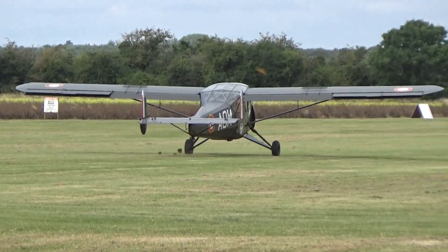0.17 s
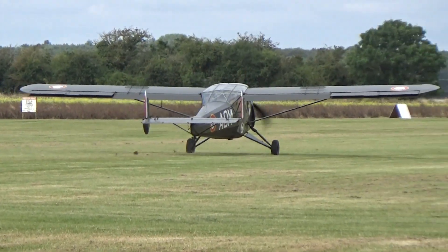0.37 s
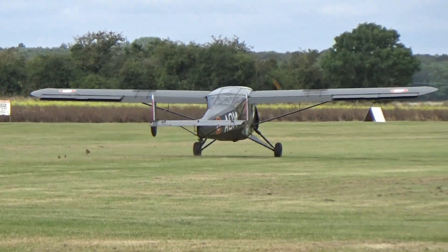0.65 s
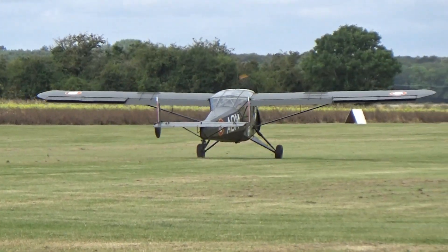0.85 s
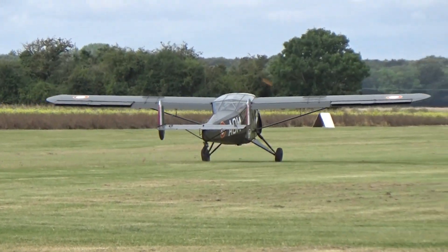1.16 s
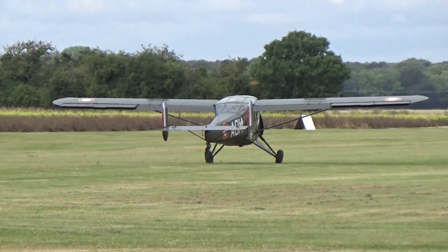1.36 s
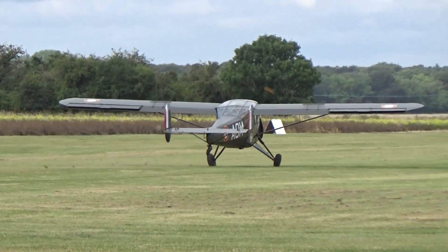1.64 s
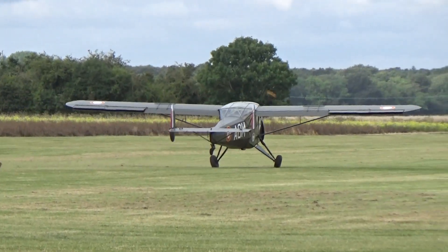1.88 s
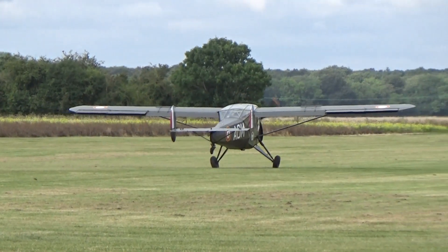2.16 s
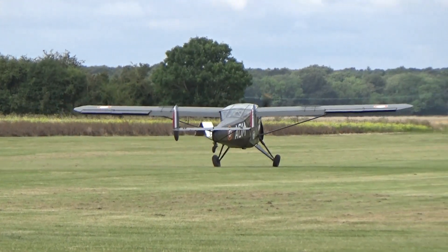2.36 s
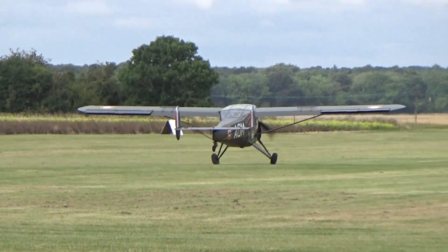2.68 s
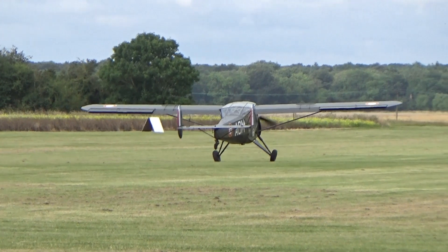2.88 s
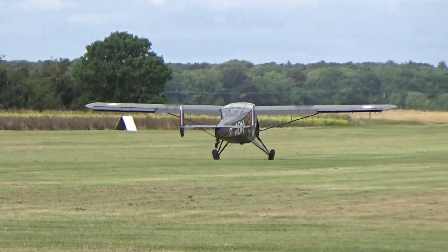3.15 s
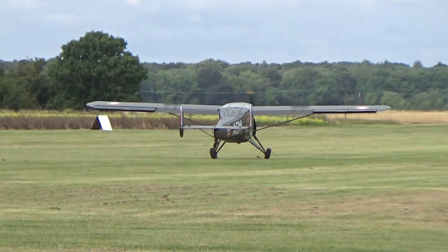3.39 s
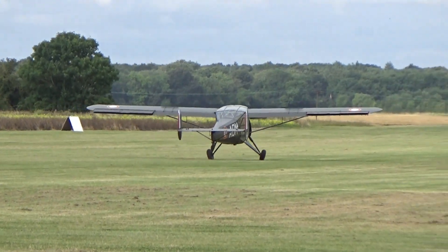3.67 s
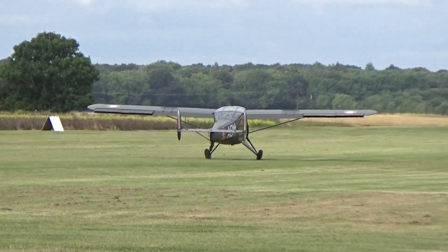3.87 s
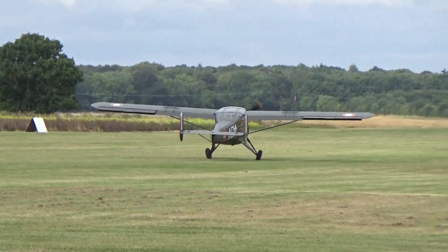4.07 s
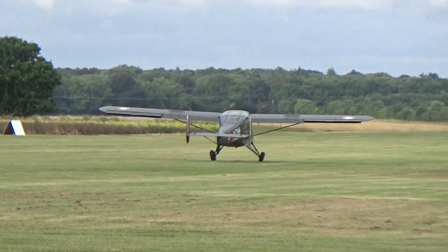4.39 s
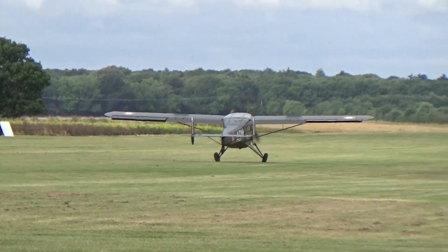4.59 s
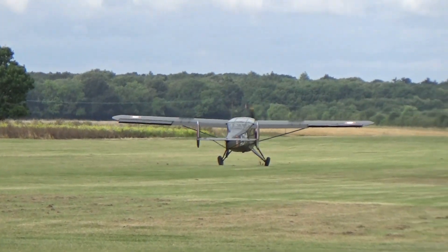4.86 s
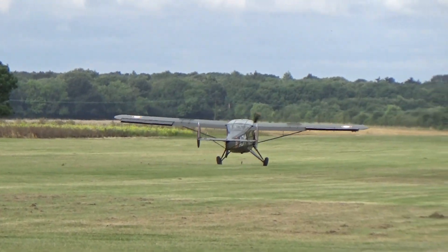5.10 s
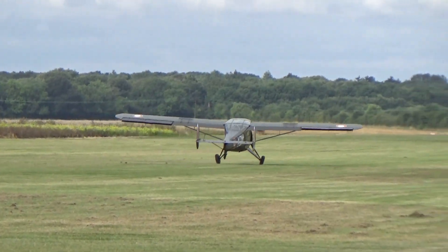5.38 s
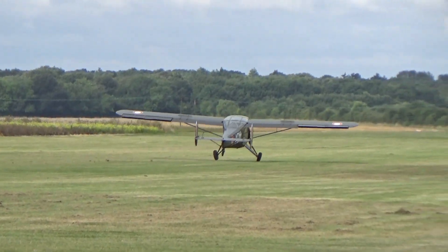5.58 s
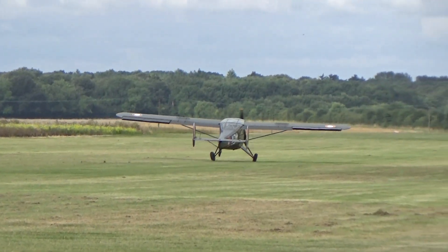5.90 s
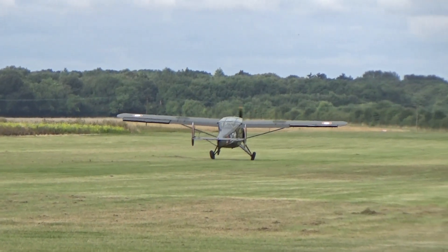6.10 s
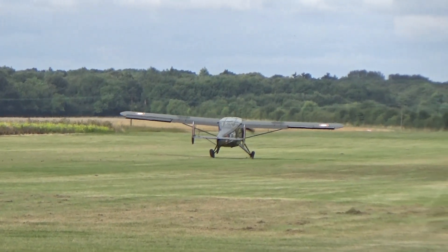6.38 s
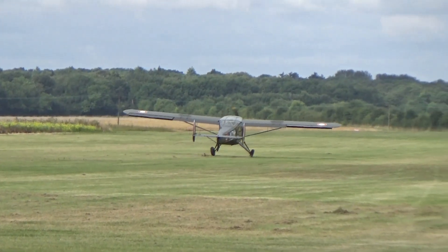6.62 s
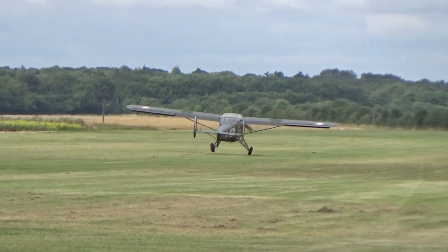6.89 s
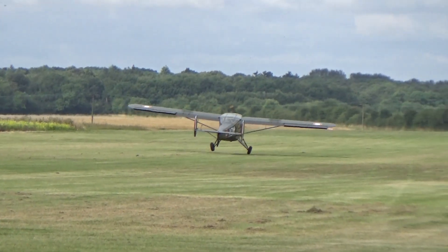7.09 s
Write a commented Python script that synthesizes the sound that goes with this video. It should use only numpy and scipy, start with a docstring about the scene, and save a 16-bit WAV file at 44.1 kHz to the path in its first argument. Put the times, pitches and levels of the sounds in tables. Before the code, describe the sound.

An open grass field with a small propeller plane rolling away from an exposed stereo microphone. At 0 s the engine is near and loudest: rapid low thumps around 75 per second merge into a rough drone, with raspy midrange, fluttering hiss and blade swishes strongest in the first half second. Short noisy, ringing pops crackle until about 0.45 s, and soft low gusts bump the microphone. From 0.5 to 2.5 s the engine runs steadily with slight swells, gradually receding, its pitch rising very slightly. Pops cluster at 2.5-3.3 s, while the sound fades faster and its highest treble dulls. A few weak pops follow around 4 s. From 4 s wind gusts strengthen, rumbling and tearing raggedly around 4.3-5 s and repeatedly from 5.4 s to the end just after 7 s, covering the distant, softening engine rasp.

```python
"""A light aircraft with a four-cylinder piston engine and a two-blade propeller rolls away over grass.
At first it is near: firings thump and rasp, blades swish, noise hisses, and short pops ring out.
Light gusts buffet the microphone meanwhile. After about 2.5 s the aircraft fades faster, its highest
treble most of all, and more pops cluster there. In the second half stronger gusts rumble and tear.
Engine and wind are shaped noise, the thumps are filtered impulses, the pops are short noisy tones."""
import sys
import numpy as np
from scipy import signal
from scipy.fft import rfft, irfft, next_fast_len
from scipy.io import wavfile
from scipy.ndimage import uniform_filter1d, map_coordinates

SR = 44100
rng = np.random.default_rng(int(sys.argv[2]) if len(sys.argv) > 2 else 0)


def persist_wave(psi):
    """Save psi, clipped to +-1, as 16-bit WAV."""
    counts = np.round(np.clip(psi, -1, 1) * 32767).astype(np.int16)
    wavfile.write(sys.argv[1], SR, np.atleast_2d(counts).T)


N = 319706


def amp(db):
    """Turn decibels into gain."""
    return 10 ** (np.asarray(db) / 20)


def unit(x):
    """Scale a signal to an average (rms) strength of 1."""
    return x / np.sqrt(np.mean(x ** 2) + 1e-20)


def along(points, hz):
    """Read a curve of (Hz, value) points, with pitch on a log axis."""
    point_hz, value = np.transpose(points)
    return np.interp(np.log(np.maximum(hz, 1e-3)), np.log(point_hz), value)


def curves(rows):
    """Join the rows with straight lines: one value per sample for each column after the time."""
    s, *columns = np.transpose(rows)
    return [np.interp(np.arange(N) / SR, s, column) for column in columns]


def wobble(rate):
    """A smooth random curve through a number of random knots a second."""
    knots = np.random.default_rng(rng.integers(1 << 30)).standard_normal(int(N * rate / SR) + 4)
    return map_coordinates(knots, [np.arange(N) * rate / SR])


def filtered(x, response):
    """Filter a sound by multiplying its spectrum by a response to frequency."""
    m = next_fast_len(N + SR // 2)
    spectrum = rfft(x, m) * response(np.fft.rfftfreq(m, 1 / SR))
    return irfft(spectrum, m)[..., :N]


def below(hz, edge_hz, order=4):
    """Gain of a low-pass filter: keeps what lies below the edge."""
    return 1 / np.sqrt(1 + (hz / edge_hz) ** (2 * order))


def above(hz, edge_hz, order=4):
    """Gain of a high-pass filter: keeps what lies above the edge."""
    return (hz / edge_hz) ** order * below(hz, edge_hz, order=order)


def air(level_db=-41):
    """Steady low breeze with a faint fizz: noise with a fixed spectrum."""
    # Spectrum of the breeze. Each row: frequency in Hz, relative level in dB per Hz
    air_spectrum = [(20, -22), (60, -30), (200, 3), (400, -18.5), (1500, -26), (6000, -31), (15000, -44)]
    noise = filtered(rng.standard_normal(N), lambda hz: amp(along(air_spectrum, hz)))
    return amp(level_db) * unit(noise)


def gusts():
    """Strength, eddy pitch and tearing of the wind: gusts rise, hold and die away over a restless breeze."""
    # Gusts at the microphone. Each row: start in seconds, length in seconds, level in dB at full force,
    # eddy pitch in Hz at full force, tearing in dB relative to the gust
    gust_list = [(0.183, .1, -22.5, 139, -40), (0.273, .095, -17, 380, -27), (0.386, 0.027, -20, 120, -40),
                 (.56, .2, -26, 125, -40), (0.807, .047, -23.5, 202, -40), (1.486, 0.056, -21, 139, -40),
                 (1.59, 0.079, -23.5, 179, -40), (1.691, 0.089, -23.5, 260, -38),
                 (1.984, 0.13, -24, 208, -38), (2.75, 0.048, -27, 120, -40), (3.02, 0.048, -23, 167, -40),
                 (3.647, .073, -28.5, 105, -40), (3.803, 0.16, -24, 88, -40),
                 (3.99, 0.098, -19.5, 174, -40), (4.069, 0.079, -17, 345, -26),
                 (4.214, 0.061, -22, 162, -35), (4.334, 0.1, -17.5, 275, -9),
                 (4.459, 0.361, -15.5, 400, -8), (4.533, 0.066, -14, 480, -6), (4.837, .18, -15, 450, -9),
                 (5.06, 0.091, -27, 220, -28), (5.186, 0.1, -25, 197, -20), (5.305, 0.059, -21, 269, -12),
                 (5.428, 0.097, -15.5, 410, -14.5), (5.635, 0.084, -20.5, 203, -33),
                 (5.718, 0.056, -15, 383, -14), (5.793, 0.19, -15.5, 272, -37),
                 (5.957, .1, -17.5, 345, -7.5), (6.078, 0.11, -18, 320, -12.5),
                 (6.167, 0.12, -17.5, 370, -7), (6.298, .16, -21.5, 294, -13.5),
                 (6.495, 0.061, -26.5, 318, -25), (6.627, 0.13, -22, 237, -35),
                 (6.763, 0.13, -20, 355, -7.5), (6.943, 0.14, -19, 336, -9.5),
                 (7.102, 0.12, -18, 384, -7.5)]
    attack_s, release_s = 0.03, 0.045
    # eddy pitch and tearing grow as these powers of a gust's force
    pitch_law, tear_law = 0.2, 1.6
    breeze_db, breeze_swing_db, breeze_hz = -37, 3.5, 104
    t = np.arange(N) / SR
    power = amp(breeze_db + breeze_swing_db * wobble(13)) ** 2
    # where gusts overlap, the stronger one counts for more in the pitch
    pitch_sum, tear_power = breeze_hz * power, np.zeros(N)
    for start, length, db, hz, tear_db in gust_list:
        near = (t > start) & (t < start + length + 10 * release_s)
        age = t[near] - start
        rise = np.minimum(age / attack_s, 1)
        force = rise * np.exp(-np.maximum(age - length, 0) / release_s)
        gust_power = (amp(db) * force) ** 2
        power[near] += gust_power
        pitch_sum[near] += gust_power * hz * force ** pitch_law
        tear_power[near] += (amp(db + tear_db) * force ** tear_law) ** 2
    return np.sqrt(power), pitch_sum / power, np.sqrt(tear_power)


def buffet(eddy_hz, lumps_db=1.78, pitch_swing=0.086):
    """Eddies on the microphone ports: a faster gust sheds smaller, higher eddies."""
    # Spectrum of the eddies. Each row: frequency as a multiple of the eddy pitch, relative level in dB per Hz
    eddy_spectrum = [(.1, -7.5), (.3, -5), (.6, 2), (1, -1), (1.5, -7.5), (2.2, -17), (4, -28.5), (12, -69),
                     (40, -100)]
    eddy = wobble(70)
    hz, t, z = signal.stft(rng.standard_normal(N), SR, nperseg=512, noverlap=384)
    pitch = np.interp(t, np.arange(N) / SR, eddy_hz * np.exp(pitch_swing * eddy))
    shape = amp(along(eddy_spectrum, hz[:, None] / pitch))
    shape /= np.sqrt(np.mean(shape ** 2, axis=0))
    noise = signal.istft(z * shape, SR, nperseg=512, noverlap=384)[1][:N]
    noise = unit(filtered(noise, lambda f: above(f, 69, order=2)))
    # even out the level: the gust sets the strength, the eddies only decide the detail
    strength = np.sqrt(np.abs(uniform_filter1d(noise ** 2, size=SR // 40)))
    return noise / strength * unit(amp(lumps_db * eddy))


def tearing(strength, ragged_db=3, flutter_db=1.5, bright_at_db=-22, bright_db=3):
    """Hard gusts tear at the edges of the ports in a ragged rush; the harder, the brighter."""
    # Spectrum of the tearing. Each row: frequency in Hz, relative level in dB per Hz
    tear_spectrum = [(300, -31), (600, 7.5), (1000, 4.5), (1600, 2), (2400, -3), (3100, -13.5), (4200, -47),
                     (8000, -67), (15000, -70)]
    noise = unit(filtered(rng.standard_normal(N), lambda hz: amp(along(tear_spectrum, hz))))
    dull = filtered(noise, lambda hz: below(hz, 1760))
    # the brightness stops growing once the tearing reaches bright_at_db
    brightness = amp(bright_db) * np.minimum(strength / amp(bright_at_db), 1) ** 2
    raggedness = unit(amp(ragged_db * wobble(260) + flutter_db * wobble(35)))
    return strength * (dull + brightness * (noise - dull)) * raggedness


def wind(stray_db=-25):
    """Eddies reach the two ports slightly out of step; a little of the buffeting differs between them."""
    # Wind across the two ports. Each row: frequency in Hz, side share a quarter cycle ahead (as a gain)
    port_skew = [(50, .04), (170, 0.11), (350, 0.22), (800, 0.3), (1500, 0.27), (4000, 0.032)]
    strength, eddy_hz, tear = gusts()
    mid = strength * buffet(eddy_hz) + tearing(tear)
    # the factor 1j moves the side signal a quarter cycle ahead
    out_of_step = filtered(mid, lambda hz: 1j * along(port_skew, hz))
    side = out_of_step + amp(stray_db) * strength * buffet(eddy_hz)
    return np.array([mid + side, mid - side])


def field(x, level_db=-20):
    """Weak scattered echoes from the field, opposite in the two channels, which widen the sound."""
    t = np.arange(SR // 4) / SR
    # the echoes fall by 60 dB in 0.22 s
    tail = rng.standard_normal(len(t)) * amp(-60 * t / 0.22)
    echo = signal.fftconvolve(x, tail / np.linalg.norm(tail))[:N]
    echo = filtered(echo, lambda hz: below(hz, 4300, order=16) * above(hz, 130, order=1))
    return amp(level_db) * np.array([echo, -echo])


def receding(level_db, loss_db_per_m):
    """Gain of a layer as the aircraft speeds away: spreading, then extra loss over the grass."""
    start_m, speed_m_per_s, accel_m_per_s2 = 61.8, 5.77, 0.65
    grazing_m = 78.5  # beyond this distance the sound skims the grass and fades faster
    t = np.arange(N) / SR
    distance = start_m + speed_m_per_s * t + accel_m_per_s2 * t ** 2 / 2
    grass_loss_db = loss_db_per_m * np.maximum(distance - grazing_m, 0)
    return amp(level_db - grass_loss_db) * start_m / distance


def pops(rise=0.0017, ring_db=-8, crack_db=-12.0):
    """Now and then the exhaust rings briefly: an unsteady tone with a puff of noise."""
    # Exhaust pops. Each row: start in seconds, relative level in dB, pitch in Hz
    pop_list = [(0.0044, -4, 3570), (0.0116, -3, 3570), (0.059, -4.5, 2790), (0.167, -7, 2770),
                (0.2758, -11, 2300), (0.383, -9, 2950), (0.4372, -8, 3360), (2.097, -9, 4340),
                (2.5481, -7, 2230), (2.5728, -5.5, 2180), (2.6145, -10, 2180), (2.6265, -6, 2210),
                (2.6786, -6.5, 2080), (2.7312, -19, 2380), (2.7846, -11.5, 4330), (2.9966, -9, 2210),
                (3.1024, -7, 1950), (3.1567, -13, 2140), (3.1965, -9, 2450), (3.2083, -7, 2280),
                (3.261, -11, 2950), (3.3144, -15, 2950), (3.952, -12.5, 3550), (3.9922, -11, 2360),
                (4.321, -13, 3660)]
    out, t = np.zeros(N + SR), np.arange(SR // 40) / SR
    swell = t / rise * np.exp(1 - t / rise)  # peaks after the rise time in seconds
    for s, db, hz in pop_list:
        noise = rng.standard_normal(len(t))
        drift = 0.069 * np.cumsum(rng.standard_normal(len(t)))  # the phase wanders, in radians
        ring = np.sin(2 * np.pi * hz * t + drift)
        burst = amp(ring_db) * ring + amp(crack_db) * noise
        out[round(s * SR):][:len(t)] += amp(db) * swell * burst
    puff = filtered(out[:N], lambda hz: below(hz, 5500, order=2) * above(hz, 1100, order=2))
    # the pops are dull: almost nothing of them lies above 9.5 kHz
    return filtered(puff, lambda hz: below(hz, 9500, order=12))


def roar(low_hz, high_hz, patchy_db=1.64):
    """One band of turbulent aircraft noise, coloured by resonances, with brief stronger patches."""
    # Spectrum of the noise. Each row: frequency in Hz, relative level in dB per Hz
    roar_spectrum = [(300, -14.5), (440, -21), (560, -12), (900, -10.5), (1300, -4), (1800, -8),
                     (2300, -7.5), (3000, -7.5), (4700, -15.5), (7500, -18.5), (9000, -11), (10500, -25.5),
                     (12000, -35.5), (14000, -53)]
    # Resonances of the exhaust stubs and cowling. Each row: centre in Hz, width in Hz, boost in dB
    stubs = [(1330, 250, -1.5), (2190, 150, 3.5), (2936, 190, 3.5), (3630, 370, 3), (4420, 190, 3),
             (8850, 2200, -7)]
    z = signal.stft(rng.standard_normal(N), nperseg=512)[2]
    patches = uniform_filter1d(rng.standard_normal(z.shape), size=4, axis=0)
    patches = unit(uniform_filter1d(patches, size=7, axis=1))
    noise = signal.istft(z * amp(patchy_db * patches), nperseg=512)[1][:N]

    def colour(hz):
        """Gain of the noise spectrum with its resonances, within the band."""
        peaks_db = sum(db / (1 + (2 * (hz - centre) / width) ** 2) for centre, width, db in stubs)
        return amp(along(roar_spectrum, hz) + peaks_db) * above(hz, low_hz) * below(hz, high_hz)

    return unit(filtered(noise, colour))


def strokes(lag):
    """Sample numbers at which the crank passes a given point of each half turn."""
    # Speed of the engine. Each row: time in seconds, firings (and blade passes) a second
    firing_rate = [(0, 74.0), (0.5, 74.0), (1, 74.2), (1.4, 75.3), (2, 75.55), (4, 75.45), (4.6, 75.2),
                   (5.2, 74.7), (7.25, 74.4)]
    half_turns = np.cumsum(curves(firing_rate)[0]) / SR
    return np.searchsorted(half_turns, np.arange(int(half_turns[-1] - 1)) + lag)


def train(at, pattern_db, scatter_db):
    """Impulses whose sizes repeat a pattern, each a little different."""
    size_db = np.resize(pattern_db, len(at)) + scatter_db * rng.standard_normal(len(at))
    return np.bincount(at, amp(size_db), N)


def puffs(impulses, rise, decay):
    """Power envelope with mean 1: each impulse swells and dies away, with both times in seconds."""
    t = np.arange(-SR // 50, SR // 50) / SR
    shape = np.exp(-2 * np.where(t < 0, -t / rise, t / decay))
    power = np.abs(signal.fftconvolve(impulses ** 2, shape, "same"))
    return power / power.mean()


def throb(power, depth):
    """Gain of a noise that is partly steady, partly pulsed; depth is the pulsed share of its power."""
    depth = np.clip(depth, 0, 1)
    return np.sqrt(1 - depth + depth * power)


def swells():
    """Gain of the rasp (dB) and power of the blade swish; each swell is a smooth bell."""
    # Brief swells of the engine's bright edge. Each row: centre in seconds, half length in seconds,
    # rasp gain in dB, swish level in dB relative to the hiss
    swell_list = [(0.0, 0.12, 6.5, 5.5), (0.22, 0.11, 4, 5.5), (0.371, 0.085, 3, 11), (1.016, 0.13, 0, 1.5),
                  (1.603, 0.068, -1.5, -3), (2.286, 0.13, 2, 3.5), (2.603, .12, 0.5, -4),
                  (3.0, 0.15, 1.5, -4), (3.28, 0.085, 0, 2.5), (5.1, 0.55, 0.5, -7), (5.803, 0.2, -0.5, 1)]
    steady_swish_db = -11.5  # relative to the hiss
    t = np.arange(N) / SR
    rasp_db, swish_power = np.zeros(N), np.full(N, amp(steady_swish_db) ** 2)
    for s, half, gain_db, swish_db in swell_list:
        bell = np.exp(-((t - s) / half) ** 2)
        rasp_db += gain_db * bell
        swish_power += (amp(swish_db) * bell) ** 2
    return rasp_db, swish_power


def engine():
    """Thump and rasp at each firing, swish between firings, nearly steady wash behind the propeller."""
    # The cylinders in firing order. Each row: relative thump in dB, relative rasp in dB,
    # delay of the thump in its pipe in seconds
    cylinders = [(2.5, 8.5, -.0002), (1, 3.5, .0005), (2.3, -1, .0005), (0.5, 3, -.0004)]
    # Spectrum of one thump. Each row: frequency in Hz, relative level in dB per Hz
    thump_spectrum = [(18, -28), (40, 2), (75, -0.5), (113, -7), (151, 0), (226, -2.5), (300, -11.5),
                      (380, -37), (600, -59), (1200, -66)]
    swell_db, swish_power = swells()
    cylinder_thump_db, cylinder_rasp_db, pipe_delay = np.transpose(cylinders)
    firings = strokes(.56)
    blades = strokes(.05)
    delays = np.round(np.resize(pipe_delay, len(firings)) * SR).astype(int)
    arrivals = np.clip(firings + delays, 0, N - 1)
    thump_impulses = train(arrivals, cylinder_thump_db, scatter_db=1.5)
    thump = -unit(filtered(thump_impulses, lambda hz: amp(along(thump_spectrum, hz))))
    exhaust = puffs(train(firings, cylinder_rasp_db, scatter_db=1.5), rise=0.001, decay=0.0057)
    jet = puffs(train(firings, cylinder_rasp_db, scatter_db=4.0), rise=0.00085, decay=0.005)
    # one blade cuts the air harder than the other
    swish = puffs(train(blades, [0, 2.5], scatter_db=2), rise=.001, decay=.0013)
    hiss_beat = np.sqrt(throb(jet, depth=0.48) ** 2 + swish_power * swish)
    # moving air on the way makes wash, rasp and hiss flutter
    wash = amp(0.14 * wobble(15)) * roar(low_hz=298, high_hz=2010) * throb(exhaust, depth=0.093)
    rasp = amp(swell_db + 0.21 * wobble(17)) * roar(low_hz=1970, high_hz=5630) * throb(exhaust, depth=0.54)
    hiss = amp(0.86 * wobble(14)) * roar(low_hz=4860, high_hz=10000) * hiss_beat
    fizz = roar(low_hz=10500, high_hz=15000) * hiss_beat
    # each layer: level at the starting distance (dB), extra loss over the grass (dB per m)
    return (receding(-27, 0.33) * thump
            + receding(-27, 0.18) * wash
            + receding(-27.5, 0.15) * rasp
            + receding(-33, 0.41) * hiss
            + receding(-43.5, 2) * fizz)


def scene():
    """The aircraft, a little left of centre in its middle range, with wind on the microphone."""
    plane = engine() + pops()
    leftward = filtered(plane, lambda hz: 0.024 * above(hz, 800) * below(hz, 3000))
    return np.array([plane + leftward, plane - leftward]) + field(plane) + wind() + air()


def record(dry):
    """A gain control turns down the loudest moments, and nothing above the band limit is kept."""
    limit_db, response_s, top_hz = -14, 0.019, 15750
    power = np.abs(uniform_filter1d(np.mean(dry ** 2, axis=0), size=max(int(response_s * SR), 1)))
    # well below the limit nothing changes; well above it the level is held near the limit
    held = dry / (1 + (power / amp(limit_db) ** 2) ** 3) ** (1 / 6)
    return filtered(held, lambda hz: hz < top_hz)


dry = scene()
out = record(dry)
persist_wave(out)
```